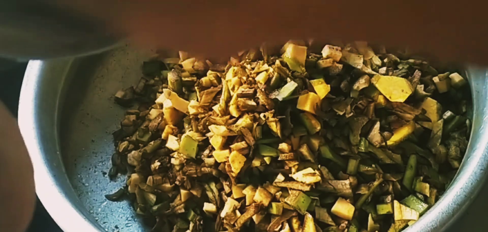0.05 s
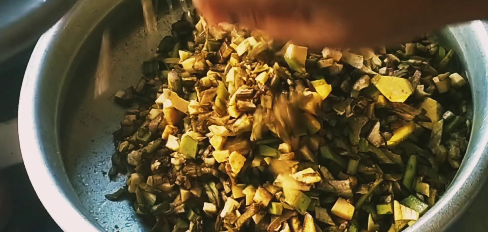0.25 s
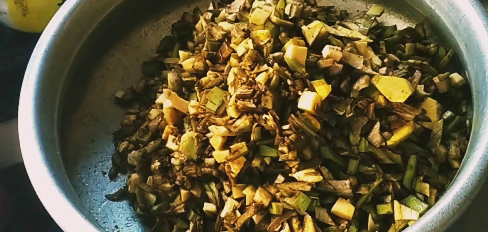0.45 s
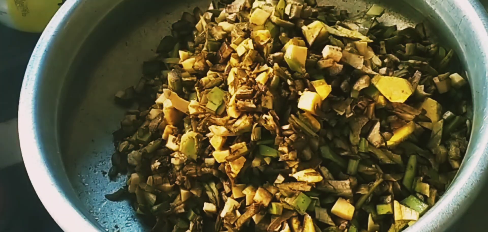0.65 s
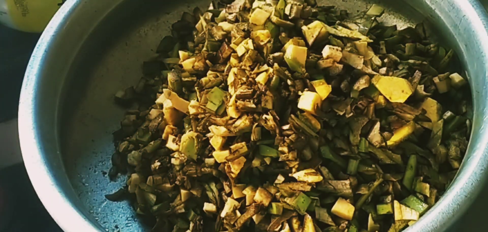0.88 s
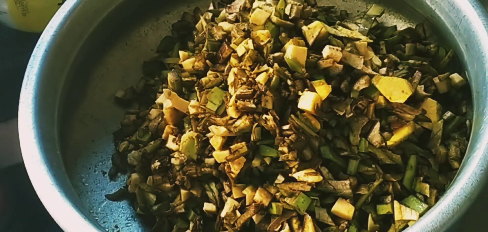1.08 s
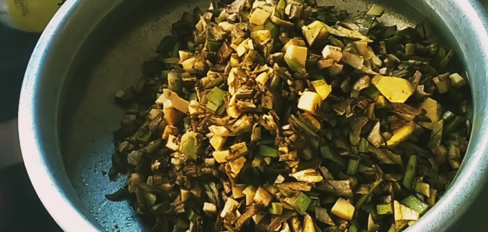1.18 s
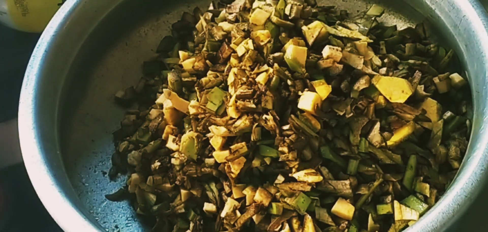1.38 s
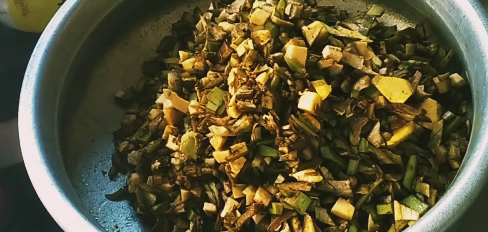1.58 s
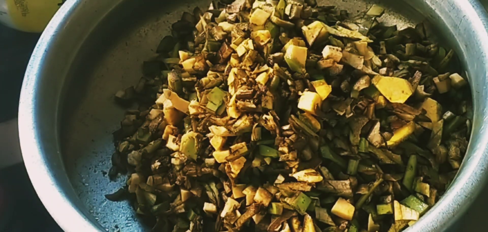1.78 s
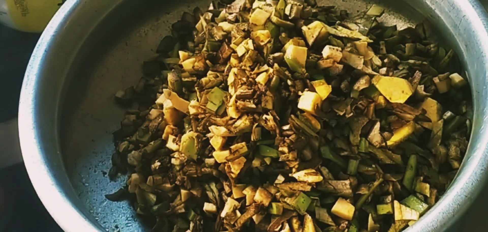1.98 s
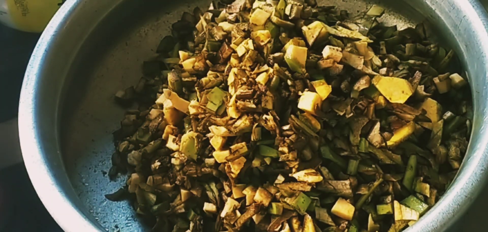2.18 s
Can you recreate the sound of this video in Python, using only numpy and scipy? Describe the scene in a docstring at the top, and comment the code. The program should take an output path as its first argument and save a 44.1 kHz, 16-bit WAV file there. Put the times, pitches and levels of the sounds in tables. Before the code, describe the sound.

A single crisp tap, very close, stands out in a quiet kitchen. Around it, chopped vegetables settle faintly in a metal pan, with soft microphone bumps and a distant ticking clock, then a low knock near the end.

```python
"""Vegetables settling in a pan

In a quiet kitchen, chopped vegetables settle in many tiny impacts that set a metal pan ringing faintly.
One sharp, dry tap at the microphone excites the heavily damped modes of a casing.
The hand holding the microphone adds a knock and soft bumps; a clock ticks each second across the room."""
import sys
import numpy as np
from scipy import signal
from scipy.fft import rfft, irfft
from scipy.io import wavfile

SR = 44100
rng = np.random.default_rng(int(sys.argv[2]) if len(sys.argv) > 2 else 0)


def output_pcm(signal):
    """Save a mono or channel-first signal as 16-bit PCM at the path in sys.argv[1].

    Samples are clipped to [-1, 1] before scaling.
    """
    pcm = np.clip(np.atleast_2d(signal).T, -1, 1) * 32767
    wavfile.write(sys.argv[1], SR, np.round(pcm).astype(np.int16))


N = 99225
T = np.arange(N) / SR

# spectrum of the room air: (frequency [Hz], relative spectral density [dB])
AIR_SPECTRUM = [(25, -12.5), (60, -7), (110, -3.5), (165, -1.5), (230, -5), (310, -5.5), (450, -10),
                (700, -13), (1300, -19), (2500, -24.5), (5000, -29), (10000, -34), (15500, -34.5)]
# modes of the clock case: (frequency [Hz], bandwidth [Hz], relative gain [dB])
CLOCK_CASE_MODES = [(850, 60, 4.5), (1100, 91, -1), (1397.4, 100, 4), (1889.4, 130, 3), (2700, 760, -9),
                    (3653, 500, -5.5), (4420, 240, -5.5), (6400, 1200, -8)]
# contacts of the hand: (time [s], impulse level [dB], mode frequency [Hz], bandwidth [Hz],
# contact cutoff [Hz], edge impulse level [dB])
HAND_CONTACTS = [(.038, -13, 140, 107, 400, -50), (.084, -7, 96, 79.82, 300, -43.5),
                 (.112, -13.5, 170, 110, 705, -44), (.261, -13.5, 142, 109.5, 497, -50),
                 (.344, -13, 270, 119, 595, -50), (0.752, -18, 230, 197, 685, -41),
                 (.937, -17.5, 158.7, 109.2, 600, -46), (1.6195, 0, 205, 220, 540, -20),
                 (1.6249, -3, 105, 147, 158, -40)]
# Gaussian swells as the pieces slide and settle: (peak time [s], standard deviation [s], level [dB])
RUSTLE_SWELLS = [(.11, .04, -67.5), (.29, .04, -70), (0.756, 0.042, -72.5), (.865, 0.023, -73)]
# spectrum of the rustle: (frequency [Hz], relative spectral density [dB])
RUSTLE_SPECTRUM = [(100, -16), (300, -3), (600, 1), (1200, -5.5), (2500, -16), (5000, -22.5),
                   (10000, -28.5), (16000, -32)]
# modes of the metal pan: (frequency [Hz], bandwidth [Hz], gain [dB])
METAL_PAN_MODES = [(307, 16, -5), (646, 4.5, 11), (996, 12, -3)]
# low mode of the tapped casing: (frequency [Hz], bandwidth [Hz], gain [dB])
THUMP_MODES = [(105, 215, 16.5)]
# high modes of the tapped casing: (frequency [Hz], bandwidth [Hz], gain [dB])
CRACK_MODES = [(3130, 1263, 15.3), (6373, 2338, 26.9), (10549, 2151, 21)]


def from_db(db):
    """Decibels to amplitude ratio."""
    return 10 ** (np.asarray(db) / 20)


def unit_power(x):
    """Normalisation to a mean square of one."""
    return x / np.sqrt(np.mean(x ** 2) + 1e-20)


def impulse(time_s, db):
    """An ideal impact: one sample, with a flat spectrum."""
    return from_db(db) * (np.arange(N) == int(time_s * SR)) + 1e-18


def lowpass(x, hz, order=2):
    """Causal attenuation of the treble."""
    return signal.sosfilt(signal.butter(order, hz, fs=SR, output="sos"), x)


def resonate(x, modes):
    """Modal superposition: the responses of damped oscillators to one force add."""
    response = 0
    for hz, bandwidth, db in modes:
        radius = np.exp(-np.pi * bandwidth / SR)
        feedback = [1, -2 * radius * np.cos(2 * np.pi * hz / SR), radius ** 2]
        response += from_db(db) * (1 - radius ** 2) / 2 * signal.lfilter([1, 0, -1], feedback, x)
    return response


def coloured(x, spectrum):
    """Spectral shaping by a smooth curve, at unit power."""
    hz, db = np.transpose(spectrum)
    f = np.maximum(np.fft.rfftfreq(N, 1 / SR), 1)
    gain = from_db(np.interp(np.log(f), np.log(hz), db))
    bass_rolloff = np.minimum(f / hz[0], 1)
    return unit_power(irfft(rfft(x) * gain * bass_rolloff, N))


def room_air(level_db=-67, waver_db=.5):
    """Ambient noise: a low rumble under faint hiss, with slight random amplitude modulation."""
    waver = unit_power(lowpass(rng.standard_normal(N), hz=3.1))
    return from_db(level_db + waver_db * waver) * coloured(rng.standard_normal(N), AIR_SPECTRUM)


def clock(first_s=.112, period_s=1.0, tick_db=-61, tock_db=-67, attack_s=.012, t60_s=.22):
    """Reverberation smears each tick and tock into a decaying puff of noise in the modes of the case."""
    envelope = 0
    for k, db in enumerate((tick_db, tock_db, tick_db)):
        age = np.maximum(T - first_s - k * period_s, 0)
        rise = np.minimum(age / attack_s, 1)
        envelope += from_db(db) * rise * np.exp(-np.log(1000) * age / t60_s)
    case_noise = resonate(rng.standard_normal(N), CLOCK_CASE_MODES)
    return envelope * unit_power(lowpass(case_noise, hz=7200, order=4))


def handling(edge_hz=1250, edge_lead_s=.0003):
    """Structure-borne sound: each hand contact gives a faint edge, then a damped swing of the casing."""
    bumps = 0
    for time_s, db, hz, bandwidth, contact_hz, edge_db in HAND_CONTACTS:
        force = lowpass(impulse(time_s, db), contact_hz)
        swing = resonate(force, [(hz, bandwidth, 0)])
        edge = lowpass(impulse(time_s - edge_lead_s, edge_db), edge_hz)
        bumps += swing - edge
    return bumps


def vegetables(impacts_per_s=2800, spread_db=2, pan_coupling_db=-11.5):
    """Shot noise: tiny random impacts merge into a rustle; it and one heavier piece drive the pan."""
    sizes = from_db(spread_db * np.minimum(rng.exponential(1, N), 4))
    signs = rng.choice([-1, 1], N)
    landings = rng.random(N) < impacts_per_s / SR
    swells = sum(from_db(db) * np.exp(-.5 * ((T - s) / width) ** 2) for s, width, db in RUSTLE_SWELLS)
    rustle = swells * coloured(sizes * signs * landings, RUSTLE_SPECTRUM)
    heavy_piece = impulse(time_s=.24, db=-10.5)
    return rustle + resonate(from_db(pan_coupling_db) * rustle + heavy_piece, METAL_PAN_MODES)


def tap(time_s=.228515, give_s=.00035):
    """Stiffer contact excites higher modes: a soft give thumps, then the hard hit cracks briefly."""
    soft_force = lowpass(impulse(time_s - give_s, db=0), hz=1108)
    hard_force = lowpass(impulse(time_s, db=0), hz=2213)
    return -resonate(soft_force, THUMP_MODES) - resonate(hard_force, CRACK_MODES)


def scene():
    """Linear superposition: the pressures of all sources add at one microphone."""
    return (room_air() + clock() + handling() + vegetables() + tap())[None]


def record(dry):
    """Band limiting: a steep, zero-phase low-pass removes the highest treble."""
    cutoff_hz, transition_hz = 15900, 150
    above_cutoff = (np.fft.rfftfreq(N, 1 / SR) - cutoff_hz) / transition_hz
    return irfft(rfft(dry) * (1 - np.tanh(above_cutoff)) / 2, N)


dry = scene()
out = record(dry)
output_pcm(out)
```